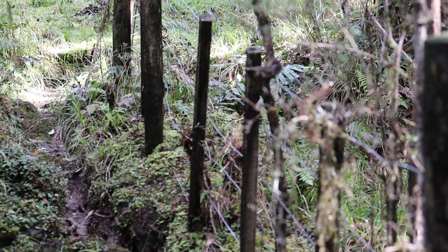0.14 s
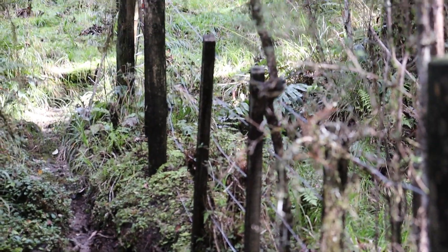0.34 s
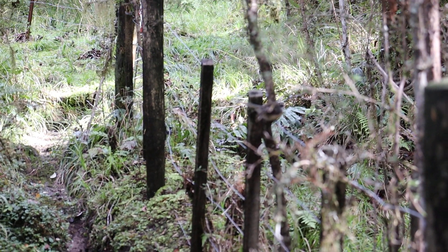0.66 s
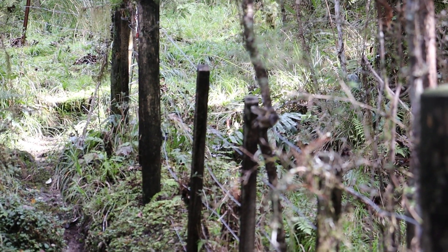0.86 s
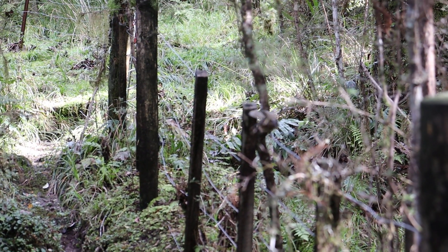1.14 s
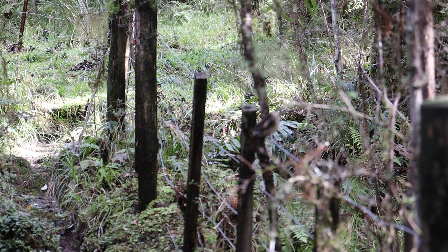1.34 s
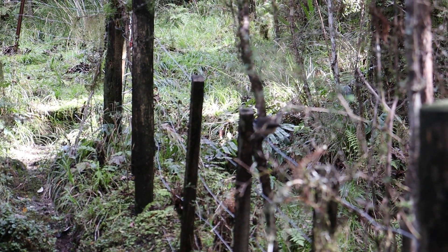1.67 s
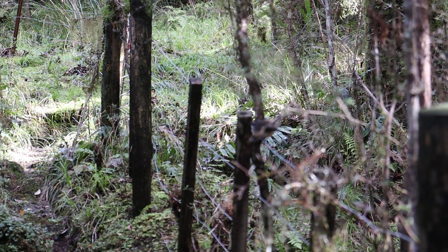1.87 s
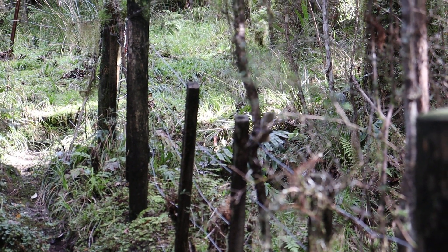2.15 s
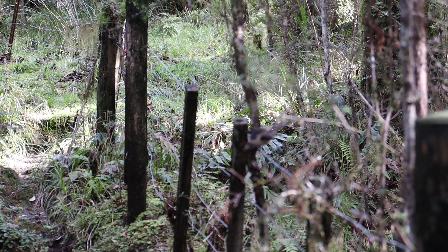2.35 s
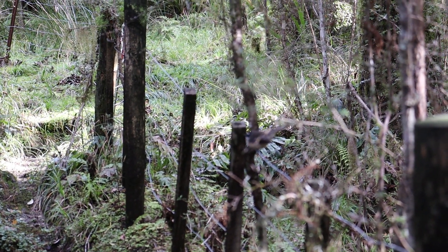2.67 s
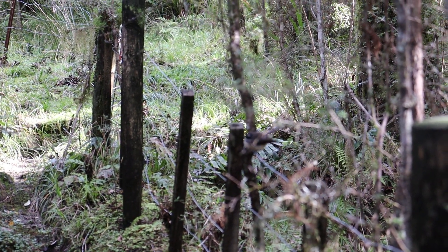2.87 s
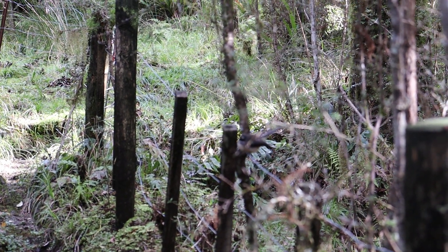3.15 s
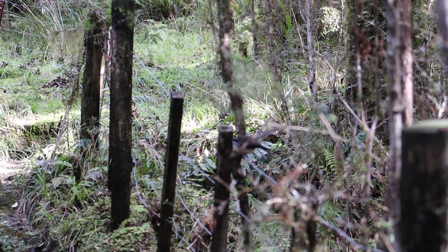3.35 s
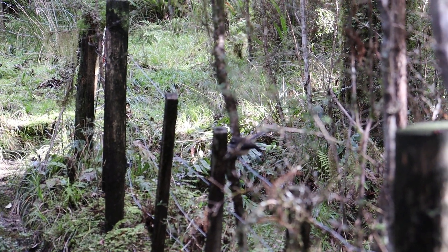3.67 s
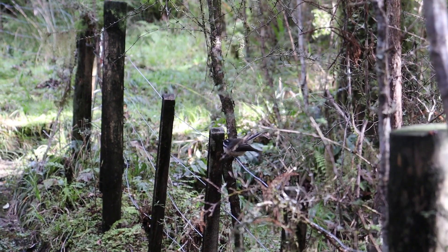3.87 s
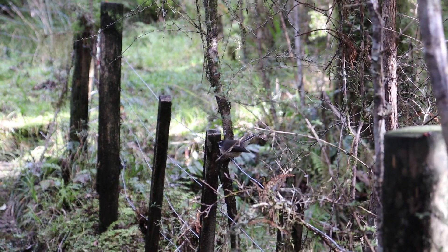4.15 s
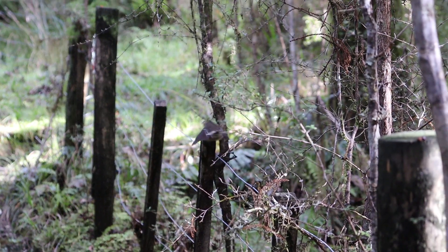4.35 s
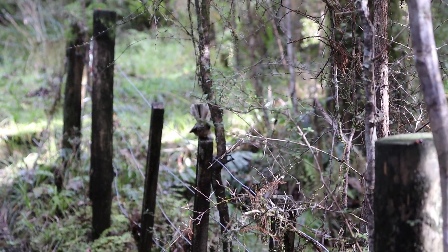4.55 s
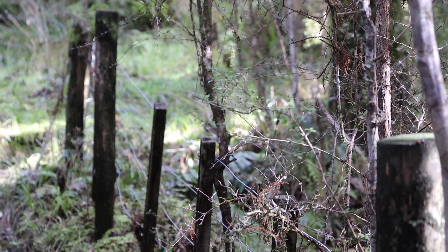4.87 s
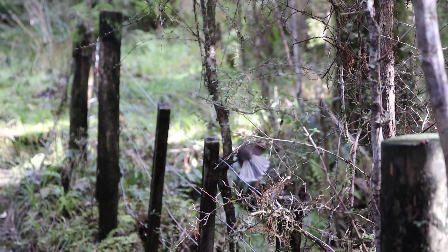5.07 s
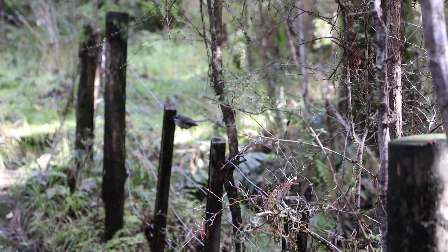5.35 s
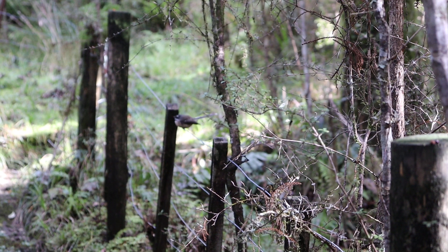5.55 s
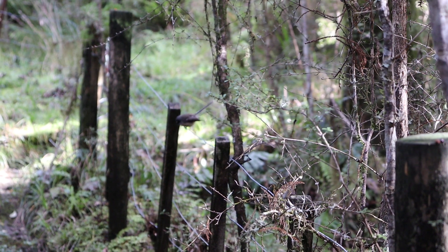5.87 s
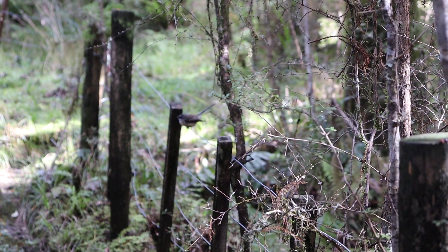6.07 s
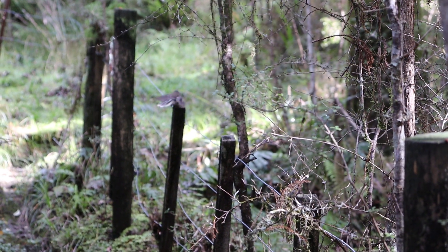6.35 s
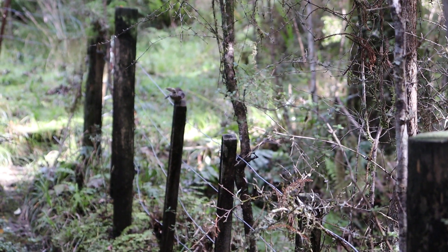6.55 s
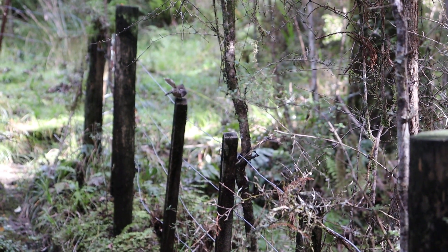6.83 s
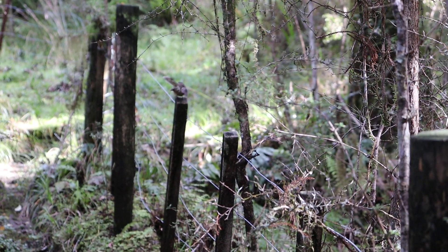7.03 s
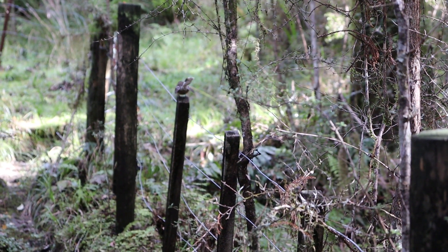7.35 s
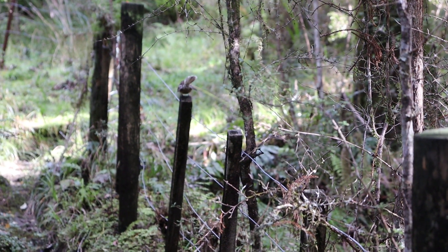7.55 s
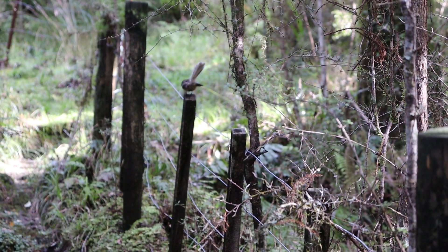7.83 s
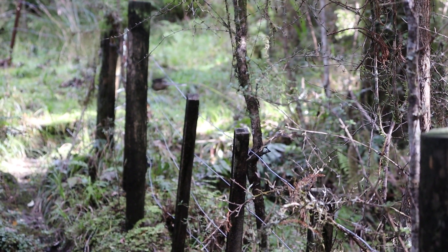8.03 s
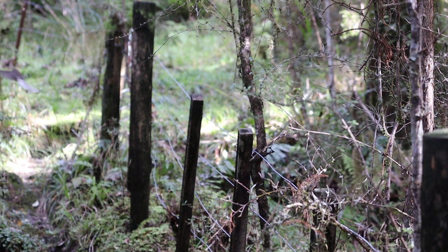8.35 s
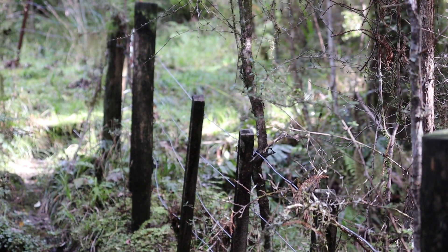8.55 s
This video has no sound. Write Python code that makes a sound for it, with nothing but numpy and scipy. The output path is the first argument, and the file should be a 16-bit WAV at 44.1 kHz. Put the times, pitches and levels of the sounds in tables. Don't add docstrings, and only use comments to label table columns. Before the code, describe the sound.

A bird flutters among trees and posts in open bush, then whistles quick rounded pips and a loud high bell tone that rings briefly between the trunks. Later come dry tongue clicks, rough little coughs, a thin high wheeze, gentle flute notes and falling chirps, separated by quiet gaps. A second small bird squeaks nasally midway. Tiny whistles come from far birds. Steady soft leaf hush and faint hiss, wide stereo, natural outdoor distance.

```python
import sys
import numpy as np
from scipy import signal
from scipy.fft import rfft, irfft, next_fast_len
from scipy.io import wavfile
from scipy.ndimage import uniform_filter1d, map_coordinates

SR = 44100
rng = np.random.default_rng(int(sys.argv[2]) if len(sys.argv) > 2 else 0)


def makeup_ratio(level_db):
    decades = np.asarray(level_db, float) / 20
    return 10 ** decades


def wav_record(signal):
    frames = np.transpose(np.atleast_2d(signal))
    bounded = np.clip(frames, -1, 1)
    quanta = np.round(bounded * 32767).astype(np.int16)
    wavfile.write(sys.argv[1], SR, quanta)


N = 383669
TOP_HZ = 15800

# pitch in Hz, level in dB per Hz.
HUSH_COLOUR = [(15, -41.5), (25, -21.5), (66, -8.5), (107, -8), (333, -4), (424, -10), (460, -9),
               (671, -9.5), (1550, -12), (2200, -13), (2380, -12.5), (4090, -15.5), (15800, -27)]
# pitch in Hz, likeness from 0 to 1.
HUSH_LIKENESS = [(25, .7), (80, 0.5), (300, 0.624), (700, 0.4), (1500, 0.26), (3000, 0.01), (15000, 0)]
# pitch in Hz, time to fade by 60 dB in seconds.
TRUNK_FADE = [(700, 0.57), (2500, 0.54), (5000, 0.38), (15000, 0.14)]
# delay in seconds, level in dB.
ECHOES = [(.012, -4), (.027, -1), (.041, -3.5)]

# start
# in seconds, length in seconds, first Hz, last Hz, level in dB.
FAR_FALLS = [(0.067, .015, 9650, 7620, -55.5), (1.069, 0.018, 9700, 7460, -53.5),
             (1.923, 0.053, 2090, 1850, -66), (2.095, 0.051, 1180, 943, -59),
             (2.221, .05, 1324, 933, -59.5), (4.257, .04, 1950, 997, -60), (4.27, .03, 1700, 1250, -59),
             (4.103, .02, 2250, 1500, -57), (4.14, .02, 2100, 1500, -59), (5.57, .03, 1790, 1765, -60),
             (5.165, .04, 4200, 3620, -65), (7.625, .016, 2500, 1700, -58), (2.959, 0.036, 2780, 2680, -44),
             (3.585, 0.025, 2110, 1184, -55), (4.779, 0.029, 4800, 3500, -61),
             (5.76, 0.056, 1230, 950, -58.5), (6.965, 0.064, 1203, 928, -63),
             (6.971, 0.12, 4600, 1940, -62), (7.922, .018, 6350, 5700, -63), (8.157, .03, 4850, 4750, -56),
             (8.163, 0.021, 3750, 3300, -52), (8.164, .02, 3600, 2900, -52),
             (8.45, 0.034, 4300, 4040, -52.5), (8.297, 0.092, 1110, 800, -63),
             (8.298, .05, 2174, 1930, -59.5), (8.299, 0.056, 4410, 3930, -53.5),
             (8.368, .024, 3060, 3010, -62), (8.396, .028, 2700, 2300, -63)]
# start in seconds, length in seconds, first Hz, last Hz, level in dB.
FAR_RISES = [(0.012, .075, 3560, 4230, -64), (.655, .03, 2080, 2150, -62), (1.487, .025, 2010, 2220, -60),
             (1.622, 0.062, 3810, 4120, -65.5), (2.455, 0.038, 448, 800, -60.5),
             (2.47, .036, 1050, 1600, -58), (3.51, 0.058, 2290, 2525, -56), (3.999, 0.2, 1784, 1873, -62),
             (3.998, 0.18, 3570, 3840, -53), (4.379, 0.027, 4370, 5250, -52),
             (4.398, 0.038, 5190, 5000, -55), (4.813, .05, 3650, 4300, -63), (5.11, 0.049, 3610, 4300, -62),
             (7.506, .02, 3480, 3560, -59), (7.525, .068, 3350, 4350, -60), (7.528, .05, 1900, 2450, -59),
             (7.578, .045, 2400, 2385, -62), (7.577, 0.11, 2760, 3950, -65.5),
             (7.585, 0.045, 1184, 1345, -59), (7.612, .028, 5950, 6400, -62),
             (8.196, .045, 3020, 3040, -58), (8.395, .05, 4100, 4180, -61)]
# time in seconds, pitch in Hz, level in dB.
WARBLE = [
    [(2.53, 3450, -66), (2.548, 3450, -59), (2.58, 3900, -60), (2.59, 5100, -59), (2.598, 4950, -55.5),
     (2.61, 4170, -61)],
    [(2.612, 4200, -64), (2.627, 4610, -59.5), (2.648, 4050, -54), (2.668, 4020, -57), (2.68, 3560, -58.5),
     (2.702, 3560, -57)],
    [(2.704, 3630, -59), (2.711, 4020, -58), (2.722, 3840, -53), (2.742, 3790, -52.5), (2.751, 4300, -58.5),
     (2.768, 3530, -59.5), (2.78, 3430, -65.5)],
]
# time in seconds, pitch in Hz, level in dB.
ZIGZAG = [(7.782, 4700, -62), (7.79, 5000, -56), (7.805, 4000, -57), (7.819, 3500, -59), (7.823, 4350, -66),
          (7.828, 4550, -58), (7.838, 4250, -56), (7.85, 4750, -55), (7.868, 4750, -62)]
# time in seconds, lowest pitch in Hz, level in dB.
WHEEZES = [
    [(4.205, 6300, -50), (4.22, 5850, -42), (4.25, 6180, -35.5), (4.28, 5760, -38), (4.3, 6280, -40)],
    [(8.101, 6050, -41), (8.111, 6250, -38), (8.119, 7000, -46), (8.128, 8050, -42), (8.134, 6900, -38),
     (8.144, 5750, -33), (8.152, 5600, -31), (8.168, 5620, -40)],
    [(5.572, 3950, -52), (5.62, 3800, -53.5), (5.68, 3750, -55)],
]
WHEEZE_FLICK_HZ = [1800, 100, 694]

# time in seconds, pitch in Hz, level in dB.
SQUEAKS = [
    [(5.453, 1110, -50), (5.469, 1256, -38), (5.485, 1303, -36), (5.497, 1258, -37), (5.506, 1330, -35),
     (5.5115, 1440, -32.5), (5.52, 1325, -35), (5.561, 1265, -37), (5.574, 960, -42)],
    [(5.753, 1090, -48), (5.763, 1165, -38), (5.775, 1230, -33), (5.8, 1238, -34.5), (5.823, 1235, -37),
     (5.857, 1330, -36), (5.865, 1294, -37), (5.871, 1121, -39), (5.876, 960, -44)],
    [(6.238, 1040, -50), (6.248, 1140, -43), (6.264, 1278, -38.5), (6.29, 1255, -39.5), (6.305, 1222, -39),
     (6.338, 1268, -38), (6.348, 1213, -37), (6.354, 1066, -40), (6.359, 950, -44)],
]
# pitch in Hz, level in dB.
BEAK = [(900, -24), (2500, -18.5), (3800, -10.5), (5100, 0), (6400, 0), (7600, -10.5), (9000, -15.5),
        (11500, -17), (13500, -22), (16000, -36)]

# start in seconds, peak in dB, clap pitch in Hz, feather hiss in dB.
WING_BEATS = [(0.908, -38.5, 880, -27), (1.065, -43.5, 800, -20.5), (1.159, -35.5, 770, -18),
              (1.255, -40, 797, -13), (1.361, -36.5, 804, -19.5), (1.469, -37, 796, -22.5),
              (1.559, -39, 770, -27), (1.655, -40.5, 860, -22), (1.775, -47.5, 810, -26.5),
              (1.849, -49, 1020, -12.5), (1.881, -41, 845, -17.5), (1.986, -46, 986, -24)]
# start in seconds, peak in dB, pitch in Hz, overtones in dB, tick in dB.
CLICKS = [
    (2.7175, -32, 1750, -30, -40),
    (2.326, -44, 1500, -30, -40),
    (3.772, -40.5, 910, -12, -31),
    (3.791, -31.5, 910, -8, -6),
    (7.645, -32.5, 1650, -23.5, -31),
    (7.667, -38, 1900, -16, -24),
    (7.685, -38, 1600, -24, -26),
    (7.9636, -22, 1850, -35, -46.5),
]
# start in seconds, peak in dB, which mouth shape.
SNAPS = [
    (5.228, -45, 1),
    (6.532, -26, 0),
    (6.5538, -25, 1),
    (6.5667, -36, 1),
]
# pitch in Hz, width in Hz, level in dB.
GAPES = [
    [(1380, 220, 1), (2890, 250, 1.5), (4230, 250, -2), (5770, 250, -12), (8900, 300, -4), (14500, 300, -3)],
    [(2330, 250, 0), (3070, 200, -10), (4030, 300, -3), (8700, 350, -8), (14800, 350, -5)],
]
# start in seconds, length in seconds, pulses in Hz, throat in dB, breath in dB.
COUGHS = [
    (3.766, .028, 220, -70, -50.5),
    (3.788, 0.098, 229.8, -44, -44.5),
    (4.26, 0.04, 173, -58, -66),
    (6.531, 0.018, 201, -67, -54),
    (6.553, .025, 201, -67, -55),
    (6.566, 0.073, 197.4, -52, -74),
]
# pitch in Hz, width in Hz, level in dB.
THROAT = [(770, 200, 4.5), (2790, 150, 5.5), (1900, 3000, -5.5)]
# pitch in Hz, width in Hz, level in dB.
MOUTH_OPEN = [(4400, 500, -5), (5300, 650, 0), (8450, 5000, -28)]
# pitch in Hz, width in Hz, level in dB.
MOUTH_SHUT = [(4400, 500, 1), (2800, 200, -6), (8450, 5000, -24.5)]

# start in seconds, low side in dB, high side in dB.
DUETS = [
    (.728, -53, -52),
    (5.09, -53, -53),
    (5.582, -53.5, -54),
]
# start in seconds, length in seconds, first Hz, settled Hz, level in dB.
NASALS = [
    (7.281, .24, 1498, 1552, -48),
    (7.859, 0.086, 866, 892, -52),
]
NASAL_ORDERS = [
    [3, -30, -6.5, -42, -32, -35, -50, -45, -45, -27],
    [3, -22, -3, -17, -11, -17, -30, -40, -45, -45],
]
# start in seconds, length in seconds, first Hz, settled Hz, level in dB.
FLUTES = [(4.203, 0.024, 6350, 5950, -41.5), (4.261, 0.015, 6130, 6050, -33),
          (4.282, .02, 6100, 6050, -35.5), (7.989, 0.086, 1623, 1592, -47.5),
          (8.037, 0.029, 1822, 1787, -43), (5.88, 0.051, 986, 997, -43.5), (5.931, 0.032, 1010, 1040, -56),
          (6.073, 0.079, 1044, 1023, -45.5), (6.14, .069, 1052, 1031, -41), (6.205, .04, 1015, 1030, -47.5),
          (6.348, 0.048, 2486, 2423, -32), (6.393, 0.058, 2438, 2400, -43.5),
          (7.12, 0.052, 2748, 2660, -36), (7.158, 0.052, 2650, 2672, -39),
          (7.199, 0.038, 2688, 2677, -44.5), (8.545, .16, 863, 841, -47)]
FLUTE_ORDERS = [3.5, -39, -42, -56, -50, -38]
# start in seconds, length in seconds, top Hz, bottom Hz, level in dB.
SWEEPS = [(2.094, 0.048, 2380, 1800, -47.5), (2.214, 0.056, 2554, 1786, -37),
          (2.27, 0.044, 2493, 1898, -34), (2.792, .055, 2636, 1454, -23.5), (4.07, 0.015, 1410, 1134, -47),
          (4.1, 0.0106, 1330, 1130, -42.5), (4.143, 0.017, 1270, 1140, -45.5),
          (4.42, 0.063, 3646, 1700, -42.5), (4.512, .045, 2684, 1956, -47.5),
          (4.694, 0.032, 2185, 1800, -54.5), (5.767, 0.044, 2455, 1870, -41),
          (5.831, 0.035, 2384, 1894, -44), (6.007, 0.029, 2453, 1748, -44.5),
          (6.027, 0.0291, 2524, 1707, -41), (6.741, 0.044, 2650, 1674, -32.5),
          (8.044, 0.031, 2504, 2235, -50.5)]
SWEEP_ORDERS = [2, -20, -30, -44, -52, -52]
# start in seconds, length in seconds, top Hz, bottom Hz, level in dB.
STRUCK = [
    (7.9625, .042, 2295, 1800, -29.5),
]
# start in seconds, length in seconds, first Hz, last Hz, level in dB.
PIPS = [
    (2.446, 0.059, 2205, 1965, -28),
    (2.489, 0.036, 1975, 1932, -23),
    (2.529, .034, 1892, 1908, -15.5),
    (2.561, 0.031, 1935, 1960, -14.5),
    (2.638, 0.025, 2290, 2750, -31.5),
    (2.647, .045, 2822, 2883, -20.5),
    (2.708, 0.053, 2825, 2874, -27),
    (2.686, 0.05, 1440, 1385, -27),
    (3.339, 0.042, 2073, 2055, -21),
    (3.384, 0.018, 2090, 2090, -34),
]
# pitch in Hz, level in dB.
PIP_TRACT = [(4000, -28), (6000, -36), (8500, -45), (10000, -34), (11600, -30), (13000, -26), (14300, -19),
             (15600, -26)]
# start in seconds, length in seconds, first Hz, settled Hz, level in dB.
BELLS = [
    (2.315, 0.074, 1005, 1053, -45),
    (2.588, 0.075, 1949, 1980, -26.5),
    (2.845, 0.056, 1202, 1166, -43),
    (2.974, 0.17, 3214, 2993, -17),
    (3.205, 0.14, 2157, 2081, -20),
]
# pitch in Hz, level in dB.
BELL_TRACT = [(4000, -24), (6000, -36), (8500, -45), (10000, -34), (12000, -27.5), (15000, -29)]

# attack as a share of the note, dB under at the start,
# release as a share of the note, dB under at the end, haste of the glide.
SWEEP_BLOW = (0.26, 9.1, 0.52, 3.9, 0.46)
BELL_BLOW = (0.15, 22, 0.22, 6, 3.16)
FLUTE_BLOW = (0.2, 7.5, 0.27, 4.6, 3.07)
FAR_BLOW = (0.37, 5, 0.35, 4.8, .3)
PIP_BLOW = (0.46, 14, 0.46, 14.6, 1.38)
STRUCK_BLOW = (.03, 1, .4, 4.3, 6.04)


def unit(x):
    return x / np.sqrt(np.mean(x ** 2) + 1e-20)


def along(points, hz):
    f, value = np.transpose(points)
    return np.interp(np.log(hz + 1), np.log(f + 1), value)


def wobble(rate, size):
    knots = rng.standard_normal(int(size * rate / SR) + 4)
    return map_coordinates(knots, [np.arange(size) * rate / SR])


def filtered(x, response):
    m = next_fast_len(x.shape[-1] + 4096)
    spectrum = rfft(x, m) * response(np.fft.rfftfreq(m, 1 / SR))
    return irfft(spectrum, m)[..., :x.shape[-1]]


def resonances(modes):
    def response(f):
        total = 0
        for k, (centre, width, db) in enumerate(modes):
            ring = 1j * f * width / (centre * centre - f * f + 1j * f * width)
            total = total + (-1) ** k * makeup_ratio(db) * ring
        return total
    return response


def place(out, sound, start_s, lead_s, pan_db, leaves_db, trunks_db, echo_db=-30, tail_s=.36):
    hz = np.fft.rfftfreq(256, 1 / SR)
    t = np.arange(round(SR * tail_s / 128)) * 128 / SR
    z = rng.standard_normal((2, len(hz), len(t), 2)) @ [1, 1j]
    fade = makeup_ratio(-60 * t / along(TRUNK_FADE, hz)[:, None])
    trunks = signal.istft(z * fade, SR, nperseg=256)[1]
    t = np.arange(trunks.shape[1]) / SR
    trunks *= 1 - np.exp(-t / 0.0096)
    leaves = rng.standard_normal(len(t)) + 1.36 * rng.standard_normal(trunks.shape)
    leaves *= makeup_ratio(-60 * t / 0.13) * (t > .003)
    path = makeup_ratio(trunks_db) * trunks / np.linalg.norm(trunks[0])
    path += makeup_ratio(leaves_db) * leaves / np.linalg.norm(leaves[0])
    path[:, 0] += 1
    for late_s, db in ECHOES:
        path[:, round(late_s * SR)] += makeup_ratio(echo_db + db)

    side = np.array([[1], [-1]]) / 2
    m = next_fast_len(len(sound) + len(t) + 64, True)
    ears = makeup_ratio(pan_db * side) * np.exp(2j * np.pi * np.fft.rfftfreq(m, 1 / SR) * lead_s * side)
    heard = irfft(rfft(sound, m) * rfft(path, m) * ears, m)[:, :-32]
    room = out[:, round(start_s * SR):]
    room[:, :heard.shape[1]] += heard[:, :room.shape[1]]


def blown(s, length, first_hz, last_hz, db, attack, start_db, release, end_db, haste):
    u = np.linspace(0, 1, num=24)
    done = (1 - np.exp(-haste * u)) / (1 - np.exp(-haste))
    hz = first_hz * (last_hz / first_hz) ** done
    level = db - start_db * np.clip(1 - u / attack, 0, 1)
    level -= end_db * np.clip(1 - (1 - u) / release, 0, 1)
    return np.transpose([s + u * length, hz, level])


def orders(table):
    return lambda k, hz: table[k - 1]


def note(rows, colour, rough_db, flick_hz=0, slack_db=0, count=13, leak_db=-53.0, jitter=0.0041,
         edge_s=0.0038, size=200):
    s, pitch, level = np.transpose(rows)
    t = np.arange(s[0], s[-1], 1 / SR)
    hz = uniform_filter1d(np.interp(t, s, pitch), size=size, mode="nearest")
    slack = slack_db * np.clip(1 - hz / np.median(hz), 0, 1) * (t > np.mean(t))
    swing = .5 - .5 * np.cos(2 * np.pi * 95 * t + 1.5 * wobble(60, len(t)))
    hz = hz * (1 + jitter * rough_db * wobble(250, len(t)))
    hz = hz + flick_hz * np.sqrt((t - s[0]) / (s[-1] - s[0])) * swing ** 3
    phase = 2 * np.pi * np.cumsum(hz) / SR
    tone = np.zeros(len(t))
    for k in range(1, count + 1):
        flutter = rough_db * min(k, 5) * wobble(72.6, len(t))
        strength = makeup_ratio(colour(k, k * hz) - slack * max(k - 4, 0) + flutter) * (k * hz < TOP_HZ)
        tone += strength * np.sin(k * phase + rng.uniform(0, 6))
    tone += makeup_ratio(leak_db) * np.diff(rng.standard_normal(len(t) + 1))
    edge = np.clip(np.minimum(t - s[0], s[-1] - t) / edge_s, 0, 1)
    return np.sqrt(2) * tone * np.sin(np.pi / 2 * edge) ** 2 * makeup_ratio(np.interp(t, s, level))


def air():
    z = signal.stft(rng.standard_normal((2, N)), nperseg=512)[2]
    patches = uniform_filter1d(rng.standard_normal(z.shape[1:]), size=6, axis=0)
    patches = uniform_filter1d(patches, size=14, axis=1)
    pair = signal.istft(z * makeup_ratio(0.38 * unit(patches)), nperseg=512)[1][:, :N]

    def spread(hz):
        turn = np.arccos(np.clip(along(HUSH_LIKENESS, hz), -1, 1)) / 2
        return makeup_ratio(along(HUSH_COLOUR, hz)) * [np.cos(turn), np.sin(turn)]

    mid, side = filtered(pair, spread)
    steady = unit(np.array([mid + side, mid - side]))
    low = filtered(steady, lambda hz: 1 / (1 + (hz / 700) ** 2))
    breeze = makeup_ratio(0.34 * wobble(3.113, N)) - 1
    return makeup_ratio([[-56.5], [-57.5]]) * (steady + low * breeze)


def far_whistles():
    out = np.zeros((2, N))
    for row in FAR_FALLS + FAR_RISES:
        tone = note(blown(*row, *FAR_BLOW), orders([0, -32]), rough_db=3.5, count=2)
        place(out, tone, row[0], lead_s=.00008, pan_db=2.5, leaves_db=-4, trunks_db=-8, tail_s=.28)
    return out


def far_warbles():
    out = np.zeros((2, N))
    for rows in WARBLE + [ZIGZAG]:
        tone = makeup_ratio(3) * note(rows, orders([0, -32]), rough_db=1.2, count=2, size=100)
        place(out, tone, rows[0][0], lead_s=.00008, pan_db=4.0, leaves_db=-12, trunks_db=-12)
    return out


def wheezes():
    out = np.zeros((2, N))
    for rows, flick_hz in zip(WHEEZES, WHEEZE_FLICK_HZ):
        tone = note(rows, orders([0, -27]), rough_db=2, flick_hz=flick_hz, count=2, size=100)
        place(out, tone, rows[0][0], lead_s=.00008, pan_db=1.5, leaves_db=-4, trunks_db=-10)
    return out


def squeaks():
    out = np.zeros((2, N))
    early = 600
    for rows in SQUEAKS:
        tone = note(rows, lambda k, hz: along(BEAK, hz), rough_db=.7, slack_db=70, jitter=.008, size=90)
        voice = np.pad(makeup_ratio(-3.5) * tone, (early, 0))
        t = np.arange(len(voice)) / SR
        puff = filtered(rng.standard_normal(len(t)), lambda f: makeup_ratio(0.46 * along(BEAK, f)))
        rasp = makeup_ratio(-26.5 - 60 * t / 0.13) + makeup_ratio(-55.5)
        voice += rasp * np.minimum(t / 0.017, 1) ** 3 * puff
        place(out, voice, rows[0][0] - early / SR, lead_s=.000025, pan_db=1.5, leaves_db=-9.0, trunks_db=-13.0)
    return out


def click(db, hz, over_db, tick_db, t60, t):
    phase = 2 * np.pi * hz * (t + 0.11 * 0.0024 * (1 - np.exp(-t / 0.0015)))
    ring = np.sin(phase) + makeup_ratio(over_db) * (np.sin(2 * phase) + 0.61 * np.sin(3 * phase))
    ring = makeup_ratio(-60 * t / t60) * (1 - np.exp(-t / 0.00024)) * ring
    noise = makeup_ratio(tick_db - 60 * t / 0.011) * rng.standard_normal(len(t))
    return makeup_ratio(db) * (ring + filtered(noise, resonances([(6050, 4000, 0)])))


def wing_beats():
    out, t = np.zeros((2, N)), np.arange(SR // 12) / SR
    for s, db, hz, hiss_db in WING_BEATS:
        beat = makeup_ratio(db + hiss_db - 60 * t / 0.19) * np.minimum(t / .004, 1) * rng.standard_normal(len(t))
        thump_db = db - 5 + 1.2 * (db + 38)
        thump_hz = 225 * rng.uniform(0.856, 1.156)
        swell = np.minimum(t / 0.026, 1) ** 3
        beat += makeup_ratio(thump_db - 60 * t / 0.087) * swell * np.sin(2 * np.pi * thump_hz * t)
        gaps_s = rng.uniform(0.0043, 0.0064, size=5) * (np.arange(5) > 0)
        for k, late_s in enumerate(np.cumsum(gaps_s)):
            clap_hz = hz * (1.03 - 0.05 * k) * rng.uniform(0.918, 1.04)
            clap = click(db - .4 - 2.7 * k, clap_hz, -6.5, -5.0, 0.017, t)
            beat += np.roll(clap, round(late_s * SR))
        place(out, beat, s, lead_s=.0001, pan_db=1.5, leaves_db=-6.0, trunks_db=-13.0)
    return out


def tongue_clicks():
    out, t = np.zeros((2, N)), np.arange(SR // 12) / SR
    for s, db, hz, over_db, tick_db in CLICKS:
        sound = click(db, hz, over_db, tick_db, 0.017, t)
        place(out, sound, s, lead_s=.0001, pan_db=1.0, leaves_db=0.0, trunks_db=-11.5)
    return out


def bill_snaps():
    out = np.zeros((2, N))
    blow = np.eye(1, SR // 20)[0]
    for s, db, gape in SNAPS:
        mouth = resonances(GAPES[int(gape)])
        ring = filtered(blow, lambda f: mouth(f) / (1 + 1j * f / 9000) ** 2)
        place(out, makeup_ratio(db) * ring / np.abs(ring).max(), s, lead_s=.0001, pan_db=3.5, leaves_db=-1.5, trunks_db=-8.0)
    return out


def coughs():
    out = np.zeros((2, N))
    for s, length, rate_hz, throat_db, breath_db in COUGHS:
        t = np.arange(round(length * SR)) / SR
        cycle = np.cumsum(rate_hz * (1 + 0.056 * wobble(80, len(t)))) / SR
        pulses = np.diff(np.floor(cycle), prepend=0) * makeup_ratio(2 * rng.standard_normal(len(t)))
        breath = rng.standard_normal(len(t)) * (.4 + np.exp(-3 * (cycle % 1)))
        swell = np.abs(np.sin(np.pi * t / length)) ** 0.12
        opened = np.clip(t / .04, 0, 1)
        mouth = (1 - opened) * filtered(breath, resonances(MOUTH_SHUT))
        mouth += opened * filtered(breath, resonances(MOUTH_OPEN))
        throat = filtered(pulses, lambda f: resonances(THROAT)(f) ** 2)
        voice = makeup_ratio(throat_db) * unit(throat) + makeup_ratio(breath_db) * unit(mouth)
        place(out, swell * voice, s, lead_s=.0001, pan_db=0.5, leaves_db=-4, trunks_db=-11.5)
    return out


def duets():
    out = np.zeros((2, N))
    for s, low_db, high_db in DUETS:
        low_side = blown(s, .05, 1297, 1600, low_db, *FAR_BLOW)
        high_side = blown(s, .05, 1782, 1711, high_db, *FAR_BLOW)
        tone = sum(note(rows, orders([3.5, -14]), rough_db=1.1, count=2) for rows in (low_side, high_side))
        place(out, tone, s, lead_s=0.00011, pan_db=2.0, leaves_db=-4.5, trunks_db=-15.5)
    return out


def nasal_notes():
    out = np.zeros((2, N))
    for row, table in zip(NASALS, NASAL_ORDERS):
        tone = note(blown(*row, *FLUTE_BLOW), orders(table), rough_db=0.3, jitter=0.0022, count=10)
        place(out, tone, row[0], lead_s=.00012, pan_db=3.0, leaves_db=-11, trunks_db=-11)
    return out


def flute_notes():
    out = np.zeros((2, N))
    for row in FLUTES:
        blow = PIP_BLOW if row[1] < .07 else FLUTE_BLOW
        tone = note(blown(*row, *blow), orders(FLUTE_ORDERS), rough_db=.5, count=6)
        place(out, tone, row[0], lead_s=0.00013, pan_db=2.0, leaves_db=-12.0, trunks_db=-15.5)
    return out


def falling_sweeps():
    out = np.zeros((2, N))
    for row in SWEEPS:
        strain_db = 1.0 * (row[-1] + 23.5)
        strained = np.add(SWEEP_ORDERS, strain_db * (np.arange(len(SWEEP_ORDERS)) > 0))

        def colour(k, hz):
            tight = .07 * np.maximum(hz / k - 2150, 0)
            return strained[k - 1] - (k > 1) * tight

        tone = note(blown(*row, *SWEEP_BLOW), colour, rough_db=0.7, count=6, leak_db=-44)
        place(out, tone, row[0], lead_s=.00011, pan_db=0.2, leaves_db=-3.5, trunks_db=-12.0, echo_db=-10.5)
    for row in STRUCK:
        tone = note(blown(*row, *STRUCK_BLOW), orders([0, -50]), rough_db=.65, count=2, edge_s=.0012)
        place(out, tone, row[0], lead_s=.00011, pan_db=1.5, leaves_db=-5, trunks_db=-13.0, echo_db=-8.5)
    return out


def ringing_notes(table, blow, tract, loss_db, leak_db):
    out = np.zeros((2, N))
    for row in table:
        tone = note(blown(*row, *blow), lambda k, hz: (along(tract, hz) - loss_db * k) * (k > 1),
                    rough_db=1.04, count=8, leak_db=leak_db, jitter=.002)
        place(out, tone, row[0], lead_s=.00011, pan_db=1.4, leaves_db=-12, trunks_db=-13.0,
              echo_db=-9.5, tail_s=.6)
    return out


def pips():
    return ringing_notes(PIPS, PIP_BLOW, PIP_TRACT, loss_db=2.5, leak_db=-56)


def bell_notes():
    return ringing_notes(BELLS, BELL_BLOW, BELL_TRACT, loss_db=3, leak_db=-70)


def scene():
    far = far_whistles() + far_warbles() + wheezes()
    noises = wing_beats() + tongue_clicks() + bill_snaps() + coughs()
    song = duets() + nasal_notes() + flute_notes() + falling_sweeps() + pips() + bell_notes()
    return air() + far + squeaks() + noises + song


def band_limit(x):
    return signal.sosfilt(signal.butter(12, 15790, fs=SR, output="sos"), x)


def record(dry):
    mix = filtered(dry, lambda hz: hz < TOP_HZ)
    return band_limit(mix)


dry = scene()
out = record(dry)
wav_record(out)
```